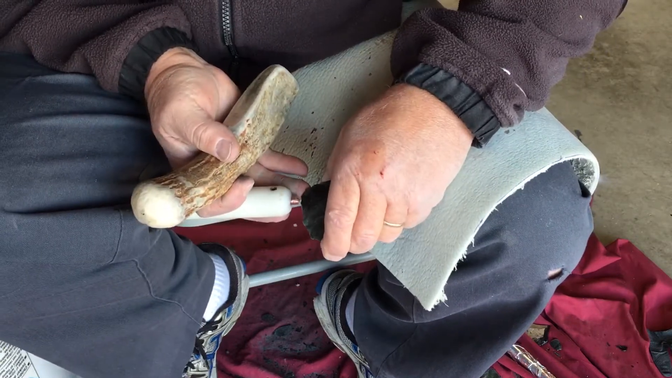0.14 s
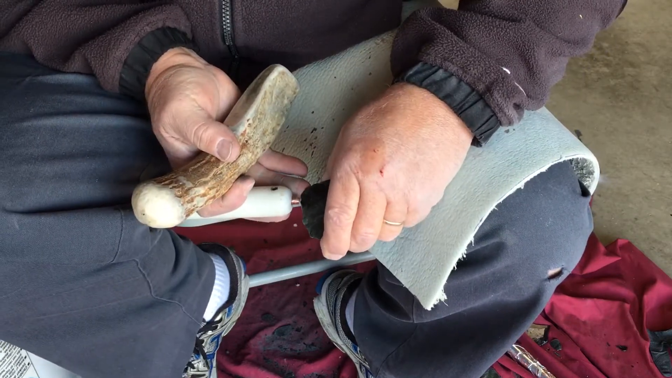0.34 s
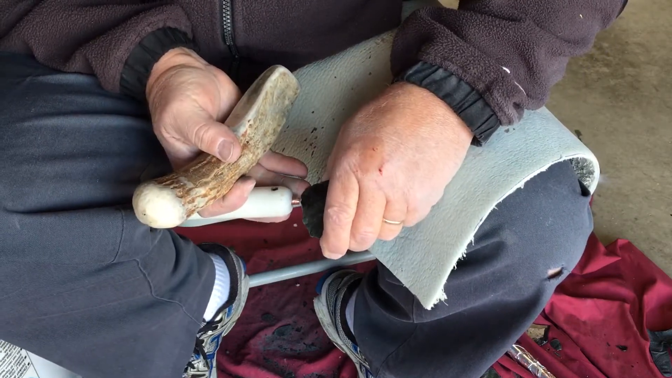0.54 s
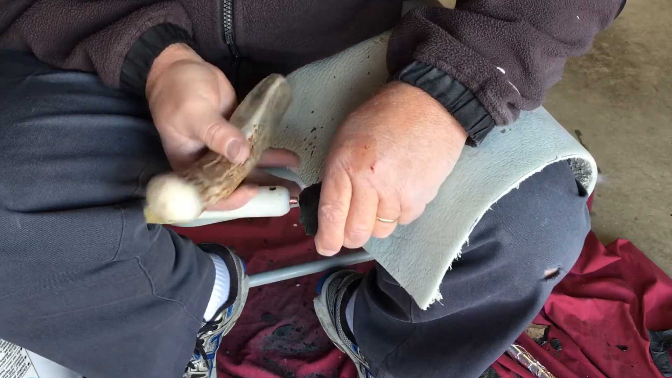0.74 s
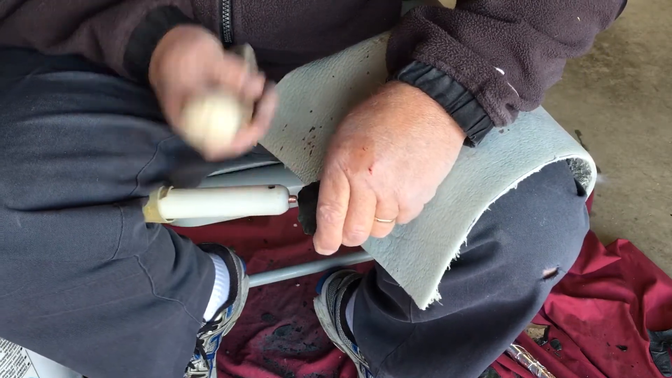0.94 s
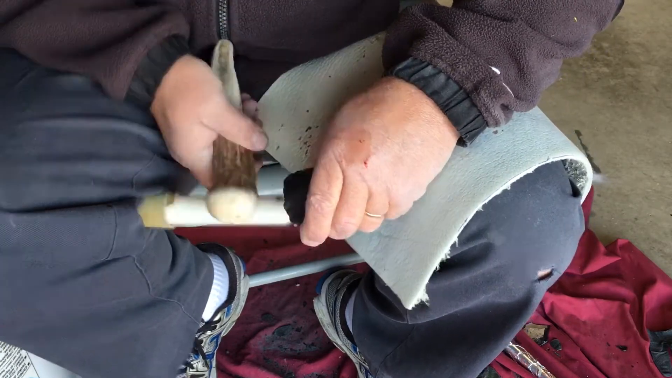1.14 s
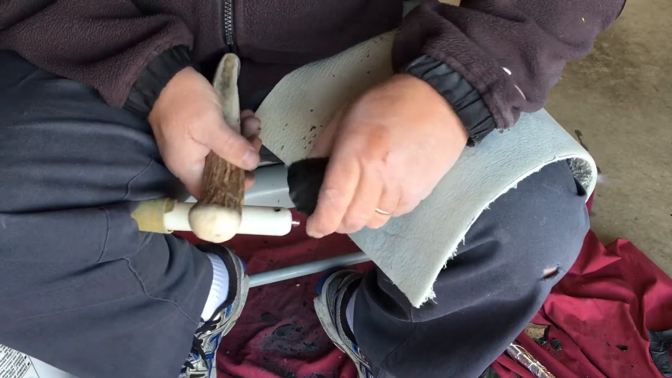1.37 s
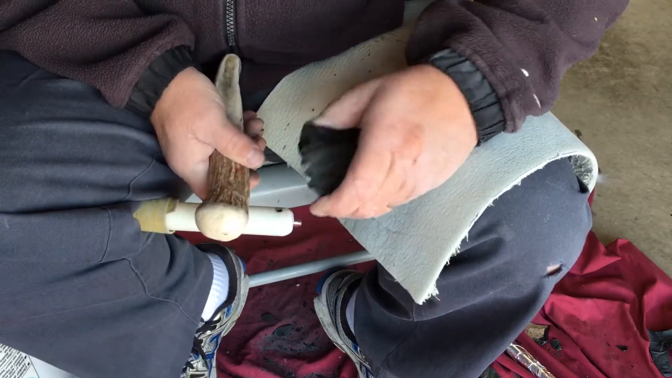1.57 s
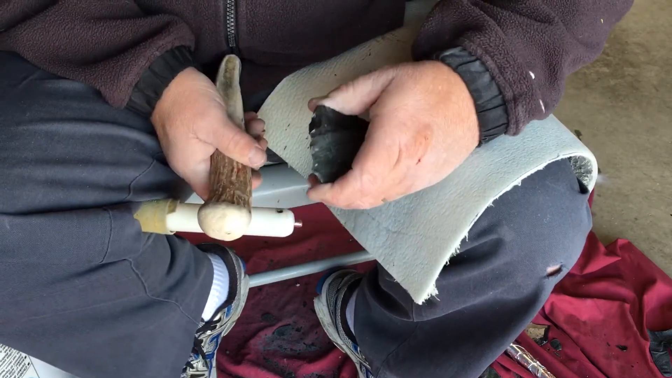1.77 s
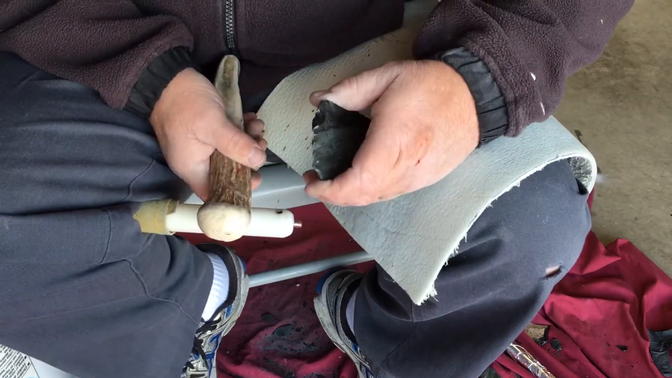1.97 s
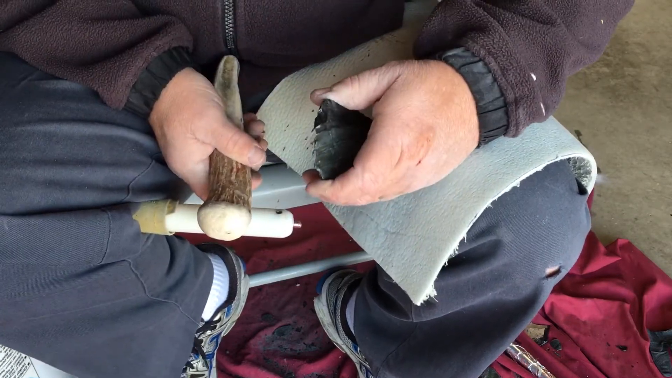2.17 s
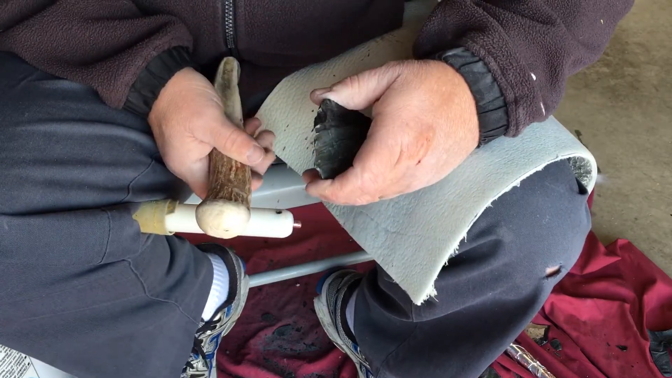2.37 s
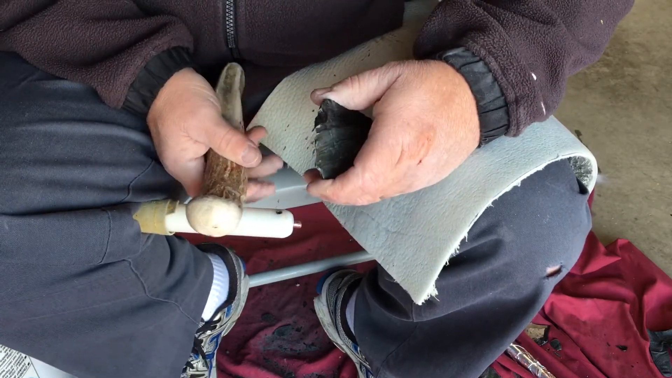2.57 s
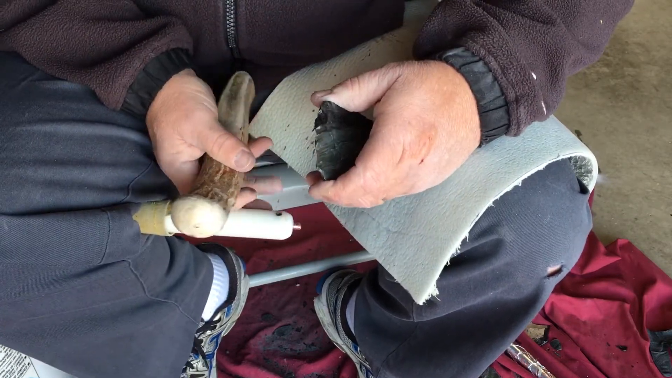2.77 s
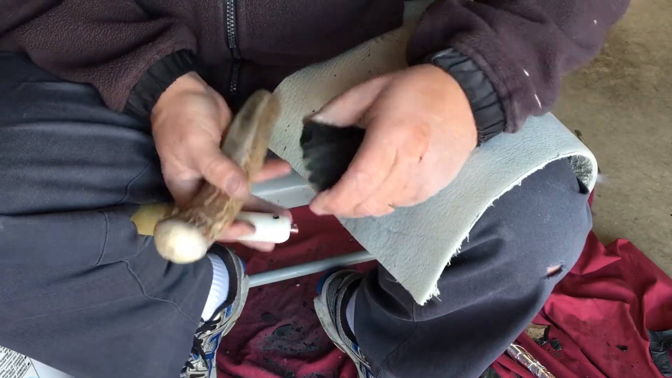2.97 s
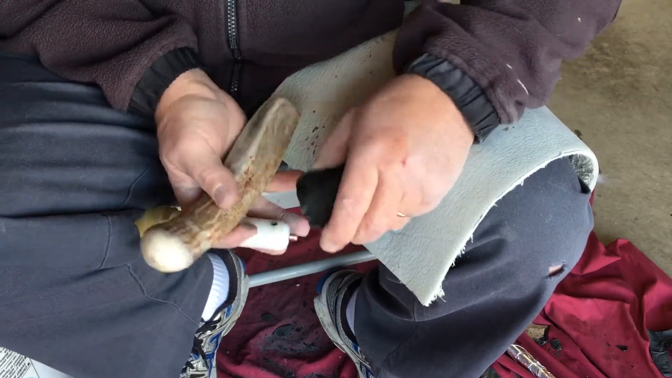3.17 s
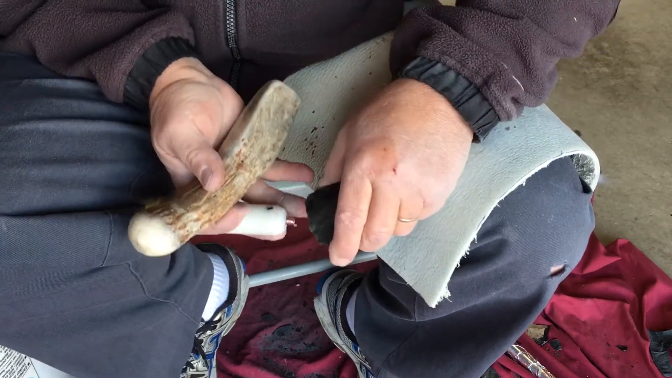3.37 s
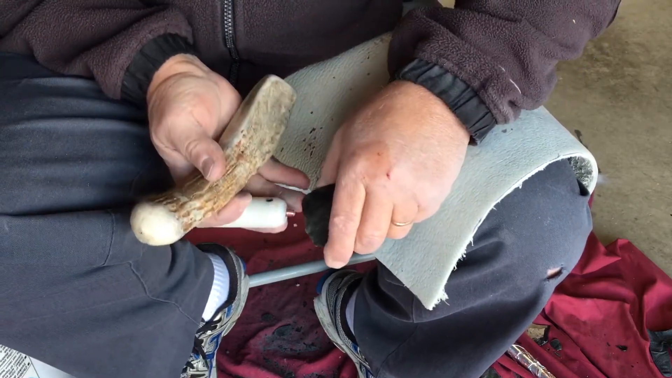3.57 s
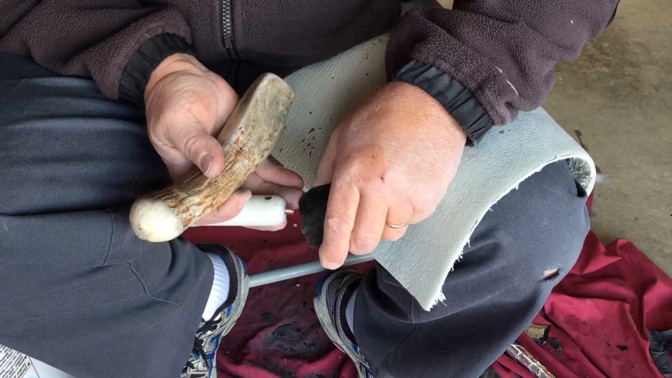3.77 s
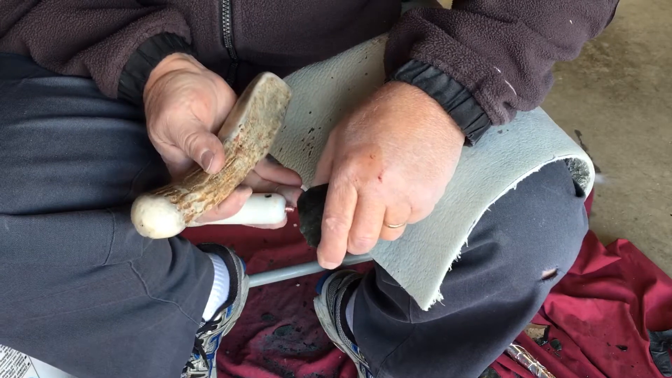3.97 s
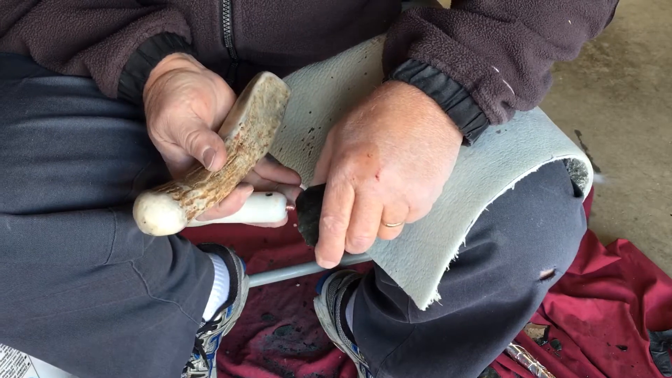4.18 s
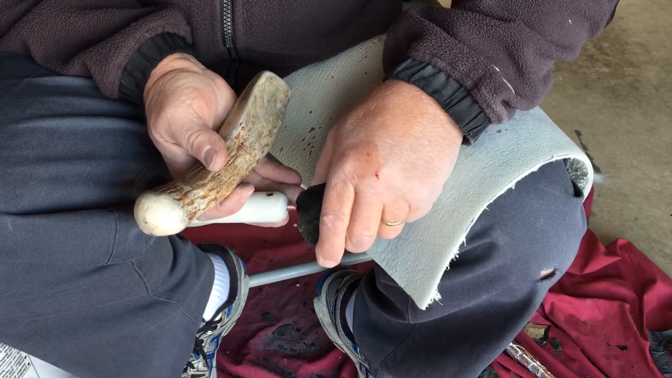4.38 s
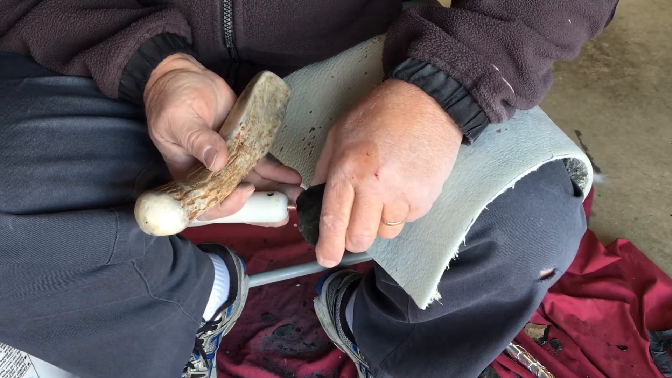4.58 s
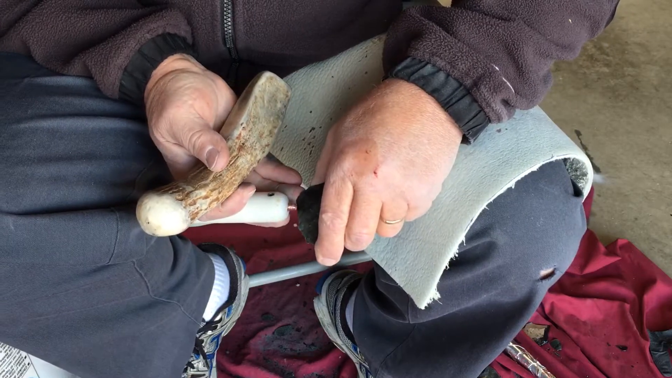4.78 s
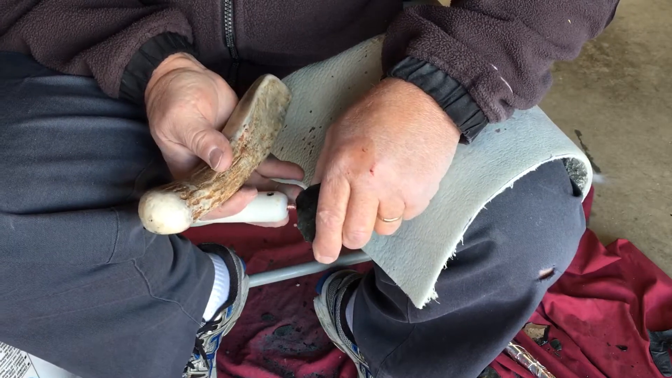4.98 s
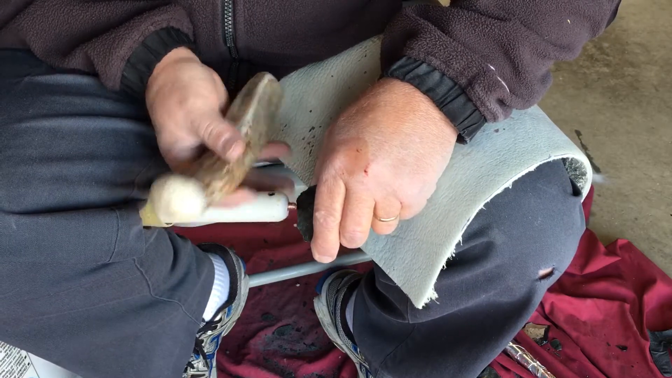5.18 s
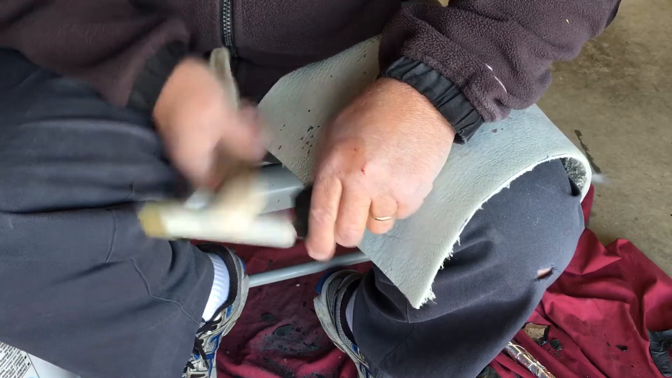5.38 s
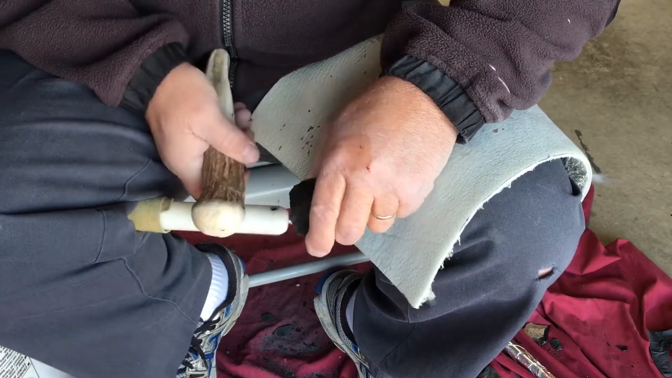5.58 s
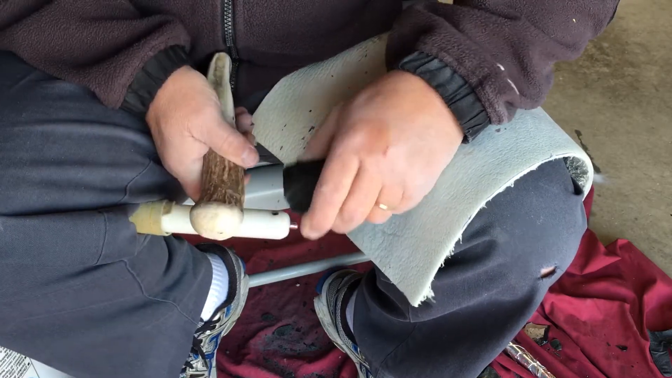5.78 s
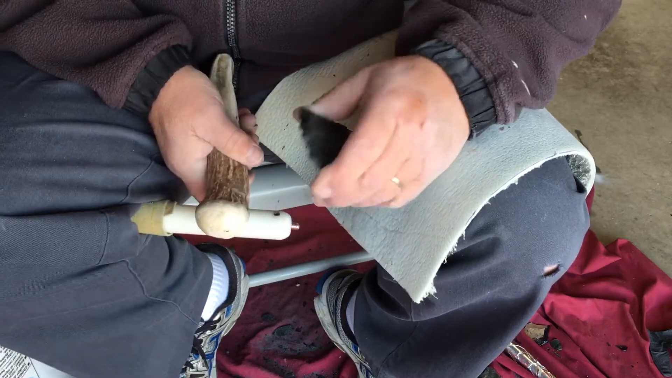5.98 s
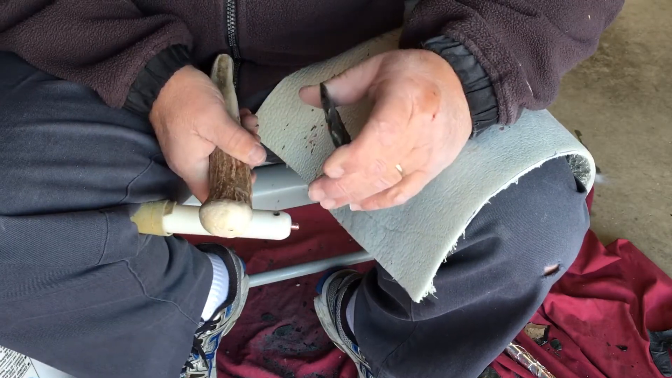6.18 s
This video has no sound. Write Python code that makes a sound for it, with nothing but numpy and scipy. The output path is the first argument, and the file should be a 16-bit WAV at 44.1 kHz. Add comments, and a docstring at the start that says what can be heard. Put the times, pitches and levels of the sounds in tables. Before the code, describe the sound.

Over a low outdoor rumble, an antler billet cracks sharply on glassy stone twice, with small knocks and chip ticks, while a car passes between blows.

```python
"""A low rumble and hum come first, with faint rustling; then an antler billet strikes obsidian, twice in all.
The open workshop stands near a road. Each blow is a noise burst plus ringing modes of stone and padded thigh.
Stone and tools knock in short damped bursts; glassy chips tick and ping as brief hiss and high sines.
Sleeves are hiss that follows the arms; a far car is coloured noise swelling and fading with distance."""
import sys
import numpy as np
from scipy import signal
from scipy.fft import rfft, irfft, next_fast_len
from scipy.io import wavfile

SR = 44100
rng = np.random.default_rng(int(sys.argv[2]) if len(sys.argv) > 2 else 0)


def master_out(mix):
    """Clip the mix to full scale and print it as 16-bit PCM to the path in sys.argv[1]."""
    frames = np.transpose(np.atleast_2d(mix))
    ceiling = np.clip(frames, -1, 1)
    pcm = np.round(ceiling * 32767).astype(np.int16)
    wavfile.write(sys.argv[1], SR, pcm)


N = 274698
TIME = np.arange(N) / SR  # s through the scene
AGE = np.arange(int(.7 * SR)) / SR  # s since a contact began

# Billet on the edge, held on the thigh. Each row: start in seconds, crack level in dB, snap pitch in Hz,
# snap level in dB, ring level in dB, ring tilt in dB per octave, thud level in dB, room level in dB.
BLOWS = [(1.0376, -8.5, 5007, -11, -13, -1.66, -36, -23.5),
         (5.3534, -10.5, 7550, -21, -15, 1, -31.5, -24.5)]
# Colour of the cracking edge. Each row: frequency in Hz, relative level in dB.
CRACK_COLOUR = [(200, -34), (400, -29), (900, -12.5), (1500, -13.5), (2400, 4), (3800, -2), (6000, -7),
                (8000, -12), (9600, -7), (11500, -15.5), (14000, -11), (16000, -18)]
# Stone and billet ringing together. Each row: frequency in Hz, relative level in dB, t60 in seconds.
STONE_MODES = [(491.8, -13, 0.12), (741, -6, .05), (985, -0.5, 0.036), (1364, -7, 0.026),
               (1910, -10, 0.051), (1877, -9.5, 0.08), (2310, -1, .038), (2376, 3.5, 0.061),
               (2429, -27, 0.74), (2514, 1.5, 0.066), (2670, -9, 0.027), (3100, -5, 0.014),
               (3285, -3, 0.039), (3702, -6, 0.016), (3794, -5.5, 0.12), (4550, -11.5, .035),
               (4860, -13, .035), (8100, -16, 0.04), (10086, -17, .04)]
# The padded thigh under the stone. Each row: frequency in Hz, relative level in dB, t60 in seconds.
THIGH_MODES = [(230.6, -9, 0.14), (362, -1.5, 0.17), (363, 2.5, .06)]
# Colour of a blow's reverberation. Each row: frequency in Hz, relative level in dB.
BLOW_ROOM_COLOUR = [(150, -30), (370, -14.5), (550, -11), (980, -1), (1400, -8), (2050, -3), (2400, 2),
                    (2800, -5.5), (3400, -5), (4700, -7.5), (7000, -14.5), (9500, -18), (11500, -24),
                    (15000, -25.5)]


def blows():
    """The edge crushes and snaps for a few milliseconds, the stone rings, the thigh takes the push."""
    out = np.zeros(N)
    for s, crack_db, snap_hz, snap_db, ring_db, tilt_db, thud_db, room_db in BLOWS:
        # a sharp fracture, followed by the crumbling of the edge
        fracture = dying(t60=.004, hold=.001)
        crumbling = from_db(-10) * dying(t60=.045, hold=.004)
        crack = from_db(crack_db) * burst(lambda hz: from_db(at_hz(CRACK_COLOUR, hz)), fracture + crumbling)

        snap_envelope = dying(t60=0.028, hold=0.00081)
        snap = from_db(snap_db) * burst(lambda hz: 1 / (1 + ((hz - snap_hz) / 1300) ** 2), snap_envelope)

        # a full blow wakes the low modes, a glancing one the high modes
        stone = ring(STONE_MODES, lambda hz: from_db(ring_db + tilt_db * np.log2(hz / 2400)),
                     scatter_db=1.3, rise_cycles=0.89)
        thud = ring(THIGH_MODES, lambda hz: from_db(thud_db), scatter_db=2.0, rise_cycles=1.3)

        direct = crack + snap + stone + thud
        room = from_db(room_db) * diffuse(BLOW_ROOM_COLOUR, build_s=0.003)
        add(out, s, early_echoes(direct, trim_db=-0.5) + room)
    return out


def burst(gain_at, envelope):
    """A short contact noise with an even spectrum, carrying the energy of its nominal envelope."""
    hz = np.arange(len(AGE) // 2 + 1) * SR / len(AGE) + 1e-3
    # random phases of a short noise keep the burst compact; the magnitudes are set exactly
    phase = np.angle(rfft(rng.standard_normal(len(AGE)) * envelope))
    even = irfft(gain_at(hz) * np.exp(1j * phase), len(AGE))
    sound = even * envelope ** (1 / 4)
    return rms_one(sound) * np.sqrt(np.mean(envelope ** 2))


def ring(modes, gain_at, scatter_db, rise_cycles):
    """Decaying modes, weighted by the colour of the contact; low ones take longer to swell."""
    out = np.zeros(len(AGE))
    for (hz, db, t60), chance in zip(modes, rng.standard_normal(len(modes))):
        gain = gain_at(hz) * from_db(db + scatter_db * chance)
        swell = 1 - np.exp(-(hz * AGE / rise_cycles) ** 2)
        out += gain * np.sin(2 * np.pi * hz * AGE) * dying(t60) * swell
    return out


# Light touches of stone and tools. Each row: start in seconds, level in dB, pitch in Hz, t60 in seconds.
KNOCKS = [(0.295, -61.5, 2940, .012), (0.51, -60.5, 1860, 0.023), (0.966, -54, 4740, 0.021),
          (1.014, -44, 2580, .18), (1.049, -17, 2660, 0.016), (1.1996, -23.5, 2120, 0.0096),
          (1.236, -43.5, 1900, 0.1), (1.3318, -31.5, 2270, 0.057), (1.4787, -44.5, 1905, 0.019),
          (4.6457, -50, 2700, 0.01), (5.33, -40.5, 3800, 0.033), (5.866, -33, 5140, 0.0058)]
REBOUND_S, REBOUND_DB = 0.016, -18  # delay, level relative to the first touch


def knocks():
    """Stone and tools touch, part and touch once more, much softer."""
    out = np.zeros(N)
    for s, db, pitch_hz, t60 in KNOCKS:
        add(out, s, knock(db, pitch_hz, t60))
        add(out, s + REBOUND_S, knock(db + REBOUND_DB, pitch_hz, t60))
    return out


# Colour of a touch. Each row: frequency in Hz, relative level in dB.
KNOCK_COLOUR = [(200, 0), (360, 6.5), (600, -12), (1000, 9), (1400, -1.5), (1850, 6.5), (2400, -2),
                (3200, 1.5), (4500, -2.5), (7000, -7.5), (14000, -6)]
# Hand-held tools when knocked. Each row: frequency in Hz, relative level in dB, t60 in seconds before damping.
TOOL_MODES = [(1053, -8, 0.052), (1829, -10, 0.074), (3090, -5, 0.058), (4450, -13.5, .03),
              (5694, -16, .03)]
# bandwidth in octaves of a knock at the typical level, and its growth per dB
KNOCK_OCTAVES, KNOCK_TYPICAL_DB, KNOCK_OCTAVES_PER_DB = 1.9, -41.5, 0.08


def knock(db, pitch_hz, t60):
    """One hand-damped contact, a click and a short ring: the harder it is, the wider its band."""
    octaves = KNOCK_OCTAVES + KNOCK_OCTAVES_PER_DB * (db - KNOCK_TYPICAL_DB)
    spread = 2 ** (octaves / 2)

    def band(hz):
        """Gain of the contact, falling away below and above its pitch."""
        below = 1 + (pitch_hz / spread / hz) ** 4
        above = 1 + (hz / pitch_hz / spread) ** 4
        return (below * above) ** -.5

    click = burst(lambda hz: band(hz) * from_db(at_hz(KNOCK_COLOUR, hz)), dying(t60, hold=0.00099))
    tools = ring(TOOL_MODES, lambda hz: band(hz) ** 2, scatter_db=1.5, rise_cycles=0.78)
    damped = from_db(-5.0) * tools * dying(2.6 * t60)
    return from_db(db) * (click + damped)


# Glass slivers snapping and landing. Each row: start in seconds, tick level in dB, ring pitch in Hz,
# ring level in dB, ring t60 in seconds.
CHIPS = [(1.198, -38, 10900, -58, .3), (1.334, -50, 10900, -65, .25), (4.893, -55, 5150, -58, .015),
         (5.107, -52.5, 5400, -56, .015), (5.5072, -50, 12550, -43, .04), (5.6032, -46, 6500, -48, .008),
         (5.57, -51, 12460, -62, .03), (5.698, -60, 8100, -60, .062), (5.82, -52, 4480, -63, .12),
         (5.927, -65, 4460, -58.5, .15)]


def chips():
    """The larger slivers, one by one."""
    out = np.zeros(N)
    for s, tick_db, ring_hz, ring_db, t60 in CHIPS:
        add(out, s, sliver(tick_db, ring_hz, ring_db, t60))
    return out


# Fine grit ticking under the stone as the grip shifts. Each row: start in seconds, end in seconds,
# typical tick level in dB, ring pitch in Hz.
GRIT = [(4.9, 5.04, -55.5, 5050), (5.56, 5.86, -56.5, 6800)]
GRIT_PER_S, GRIT_SCATTER_DB = 36, 2
GRIT_RING_DB, GRIT_T60_S = -3, .012  # ring level relative to its tick, decay


def grit():
    """The smallest slivers tick at uneven intervals, each with a strength of its own."""
    out = np.zeros(N)
    for start, end, db, hz in GRIT:
        # 16 candidates, more than any spell holds; those after the end are silent
        for k, (late, strength) in enumerate(zip(rng.random(16), rng.standard_normal(16))):
            s = start + (k + late) / GRIT_PER_S
            tick_db = db + GRIT_SCATTER_DB * strength
            add(out, s, (s < end) * sliver(tick_db, hz, tick_db + GRIT_RING_DB, GRIT_T60_S))
    return out


def sliver(tick_db, ring_hz, ring_db, t60):
    """A sliver of glass gives a thin tick of noise and one high decaying ring."""
    hiss = resonant(centre_hz=10470, width_hz=5500, size=len(AGE))
    tick = from_db(tick_db) * hiss * dying(t60=0.0092)
    return tick + from_db(ring_db) * np.sin(2 * np.pi * ring_hz * AGE) * dying(t60)


# First reflections, from the floor half a metre below and from near walls.
# Each row: delay in seconds, level in dB before the trim.
ECHOES = [(.00303, -5.5), (0.0154, -12.5), (0.0244, -17.5), (0.035, -23.5)]


def early_echoes(x, trim_db):
    """Hard surfaces nearby repeat each sound a moment later."""
    out = x.copy()
    for s, db in ECHOES:
        delayed = np.r_[np.zeros(round(s * SR)), x][:len(x)]
        out += from_db(db + trim_db) * delayed
    return out


# Colour of the walls' answer to small sounds. Each row: frequency in Hz, relative level in dB.
WALLS_COLOUR = [(150, -10), (400, -5), (1000, -2), (2400, -6.5), (4500, -4.5), (8000, -3), (14000, 0.5)]


def workshop(x):
    """The room's answer to a small sound: convolution with a diffuse tail of unit energy."""
    tail = diffuse(WALLS_COLOUR, build_s=0.0058)
    unit_energy = tail / np.sqrt(np.sum(tail ** 2))
    return signal.fftconvolve(x, unit_energy)[:len(x)]


# Reverberation of the workshop. Each row: frequency in Hz, t60 in seconds.
ROOM_T60 = [(200, 0.85), (530, 0.28), (1400, 0.42), (3700, .45), (9700, 0.34), (15000, .25)]


def diffuse(spectrum, build_s):
    """Reflections from all round the workshop build up quickly, then each band dies at its own rate."""
    field = rfft(coloured(spectrum, len(AGE)))
    hz = np.arange(len(field)) * SR / len(AGE)
    centres, t60s = np.transpose(ROOM_T60)
    tail = np.zeros(len(AGE))
    # overlapping bands whose shares add up to one at every frequency
    for share, t60 in zip(np.eye(len(centres)), t60s):
        band_gain = at_hz(np.c_[centres, share], hz)
        tail += irfft(field * band_gain, len(AGE)) * dying(t60)
    return tail * (1 - np.exp(-(AGE / build_s) ** 2))


# Arm movements that brush the sleeves. Each row: time of greatest speed in seconds, level there in dB,
# speeding-up time in seconds, slowing-down time in seconds.
MOVES = [(.76, -66.5, .14, 0.1), (1.42, -67, 0.14, 0.42), (2.52, -69.5, 0.24, 0.22), (2.98, -61, 0.2, 0.32),
         (5.75, -63.5, .18, .22)]
# Colour of cloth on cloth. Each row: frequency in Hz, relative level in dB.
SLEEVE_COLOUR = [(200, -9), (600, 0.5), (1500, 1), (3000, -0.5), (5000, -5), (9000, -3.5), (10500, -7.5),
                 (13000, -5), (16000, -7)]
# the swing swells steadily up to each blow; at rest the cloth barely stirs
SWING_DB, SWING_RISE_DB_PER_S, SWING_STOP_DB_PER_S, REST_DB = -57, 38.5, 149, -76.5


def sleeves(grain_db):
    """Fleece brushing on cloth: a soft hiss that follows the speed of the arms, grainy as the fibres catch."""
    power = from_db(REST_DB) ** 2
    for s, db, rise_s, fall_s in MOVES:
        width_s = np.where(TIME < s, rise_s, fall_s)
        move = from_db(db) * np.exp(-((TIME - s) / width_s) ** 2)
        power = power + move ** 2
    for s, *_ in BLOWS:
        slope = np.where(TIME < s, SWING_RISE_DB_PER_S, SWING_STOP_DB_PER_S)
        power = power + from_db(SWING_DB - slope * abs(TIME - s)) ** 2
    catching = resonant(centre_hz=29.99, width_hz=90, size=N)
    return np.sqrt(power) * from_db(grain_db * catching) * coloured(SLEEVE_COLOUR, N)


# Colour of the tyres. Each row: frequency in Hz, relative level in dB.
TYRE_COLOUR = [(180, -29), (300, -4), (466, -14.5), (757, -6), (897, 1), (1050, -2), (1320, -2.5),
               (1650, -5), (3180, -19), (5320, -36.5), (9000, -40), (11700, -71), (19800, -120)]
# Colour of the engine. Each row: frequency in Hz, relative level in dB.
ENGINE_COLOUR = [(30, -12), (65, 6), (130, 2.5), (230, 0), (350, -5), (600, -26), (1500, -45)]
# steady speed on a straight road; the engine is loudest just before the car draws level
CAR_NEAREST_S, CAR_M_PER_S, ROAD_M, TYRE_DB = 4.12, 14, 8.2, -54
ENGINE_LEAD_S, ENGINE_SWELL_S, ENGINE_DB = 0.47, .3, -54
# the car is screened until it comes into the open
CAR_EMERGES_S, EMERGING_S, SCREEN_DB = 2.54, 0.057, -6
# the tyres are brightest at the nearest point and dull with distance
TYRE_TREBLE_HZ, TYRE_TREBLE_DB, TREBLE_DISTANCE_POWER = 2630, 1.5, .9


def car():
    """Tyres and engine swell and fade with distance; the screen holds back the tyre hiss but not the engine."""
    near = passing(CAR_NEAREST_S, ROAD_M / CAR_M_PER_S)
    hidden = (1 - np.tanh((TIME - CAR_EMERGES_S) / EMERGING_S)) / 2  # 1 behind the screen, 0 in the open
    hiss = coloured(TYRE_COLOUR, N)
    dull = signal.sosfiltfilt(signal.butter(2, TYRE_TREBLE_HZ, fs=SR, output="sos"), hiss)
    treble = from_db(TYRE_TREBLE_DB) * near ** TREBLE_DISTANCE_POWER * (hiss - dull)
    tyres = from_db(TYRE_DB + SCREEN_DB * hidden) * near * (dull + treble)
    engine_near = passing(CAR_NEAREST_S - ENGINE_LEAD_S, ENGINE_SWELL_S)
    engine = from_db(ENGINE_DB) * engine_near * coloured(ENGINE_COLOUR, N)
    return tyres + engine


def passing(nearest_s, swell_s):
    """Gain of a source going by in a straight line: one over its distance, 1 at the nearest point."""
    return 1 / np.hypot(1, (TIME - nearest_s) / swell_s)


WHINE_HZ, WHINE_SAG_HZ_PER_S, WHINE_DB, WHINE_FADE_DB_PER_S = 403, 6, -70, 6.5  # pitch and level at the start


def whine():
    """A faint far tone, one sine that sags in pitch and dies away."""
    hz = WHINE_HZ - WHINE_SAG_HZ_PER_S * TIME
    level = from_db(WHINE_DB - WHINE_FADE_DB_PER_S * TIME)
    return level * np.sin(2 * np.pi * np.cumsum(hz) / SR)


HUM_HZ, HUM_WIDTH_HZ, HUM_DB = 99, 7, -58.5


def hum():
    """A wavering hum: noise gathered in a narrow band."""
    return from_db(HUM_DB) * resonant(HUM_HZ, HUM_WIDTH_HZ, N)


# Colour of the rumble. Each row: frequency in Hz, relative level in dB.
RUMBLE_COLOUR = [(20, -38.5), (31, -21), (43, -6.5), (65, -3.5), (100, -6.5), (130, -15.5), (190, -16.5),
                 (280, -24.5), (400, -25.5), (550, -27.5), (950, -30.5), (2500, -38.5), (9000, -52.5),
                 (16000, -52)]
RUMBLE_DB = -57


def rumble():
    """Steady noise, weighted to the bass."""
    return from_db(RUMBLE_DB) * coloured(RUMBLE_COLOUR, N)


def from_db(db):
    """Decibels to gain."""
    return 10 ** (np.asarray(db) / 20)


def rms_one(x):
    """Scale to unit rms."""
    return x / np.sqrt(np.mean(x ** 2) + 1e-20)


def at_hz(points, hz):
    """Read a table on a log-frequency axis."""
    f, value = np.transpose(points)
    return np.interp(np.log(np.maximum(hz, 1)), np.log(f), value)


def noise(gain_at, size):
    """Unit-rms noise whose colour is a function of frequency."""
    padded = next_fast_len(size)
    hz = np.arange(padded // 2 + 1) * SR / padded + 1e-3
    spectrum = rfft(rng.standard_normal(padded)) * gain_at(hz)
    return rms_one(irfft(spectrum, padded)[:size])


def coloured(spectrum, size):
    """Unit-rms noise with a tabled spectrum."""
    return noise(lambda hz: from_db(at_hz(spectrum, hz)), size)


def resonant(centre_hz, width_hz, size):
    """Unit-rms noise gathered round one resonance."""
    return noise(lambda hz: 1 / (1 + ((hz - centre_hz) / width_hz) ** 2), size)


def dying(t60, hold=0):
    """An envelope that holds and then dies exponentially, by 60 dB in t60 seconds."""
    return np.exp(-np.log(1000) * np.maximum(AGE - hold, 0) / max(t60, 1e-3))


def add(track, s, sound):
    """Mix a sound in from time s."""
    start = np.clip(round(s * SR), 0, N)
    track[start:start + len(sound)] += sound[:N - start]


ROOM_TAP_DB = -12  # the room's answer to small sounds


def scene():
    """Close work in the room, over the sounds from outside."""
    strikes = blows()
    outdoors = car() + hum() + whine() + rumble()
    background = sleeves(grain_db=1.3) + outdoors
    small = knocks() + chips() + grit()
    small = early_echoes(small, trim_db=-8.0) + from_db(ROOM_TAP_DB) * workshop(small)
    return (strikes + small + background)[None]


CUTOFF_HZ = 15800


def record(dry):
    """At the microphone's output the loudest peaks are rounded and the top of the treble is cut."""
    top = .86  # level that the rounded peaks approach, full scale being 1
    rounded = dry / (1 + (dry / top) ** 4) ** (1 / 4)
    return signal.sosfilt(signal.ellip(10, .1, 80, CUTOFF_HZ, fs=SR, output="sos"), rounded)


dry = scene()
out = record(dry)
master_out(out)
```